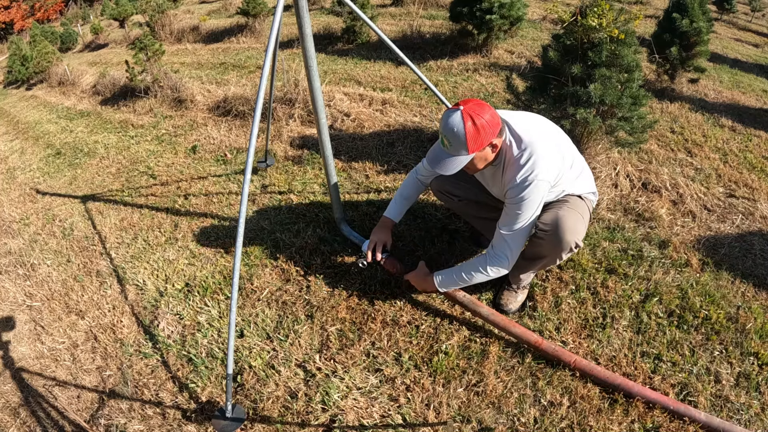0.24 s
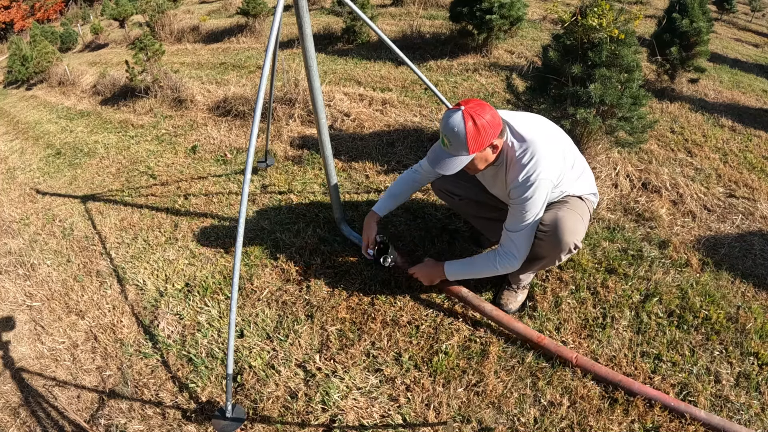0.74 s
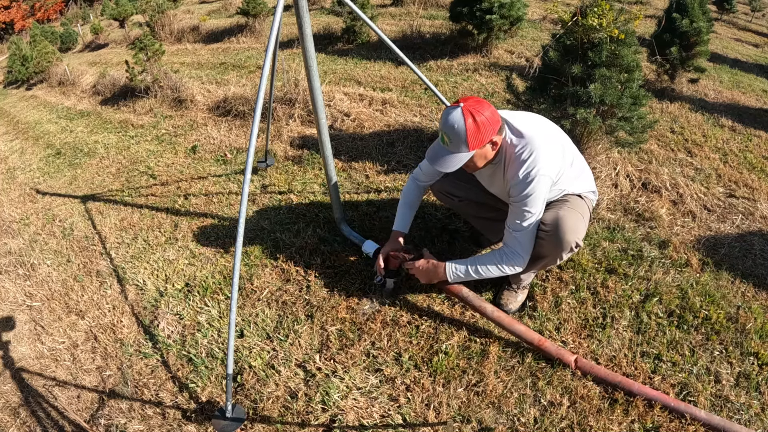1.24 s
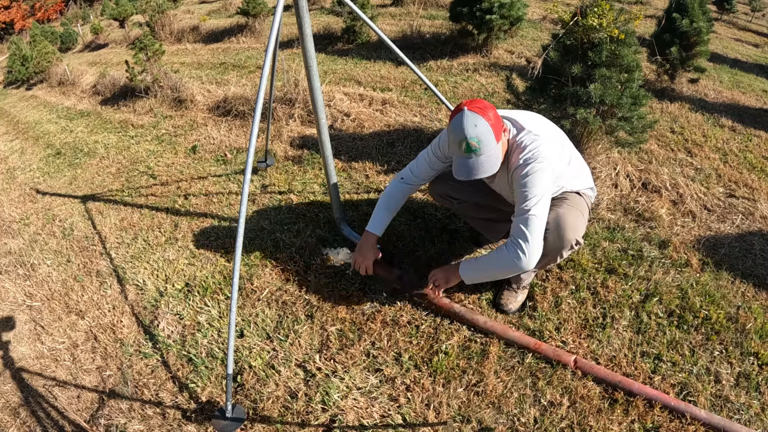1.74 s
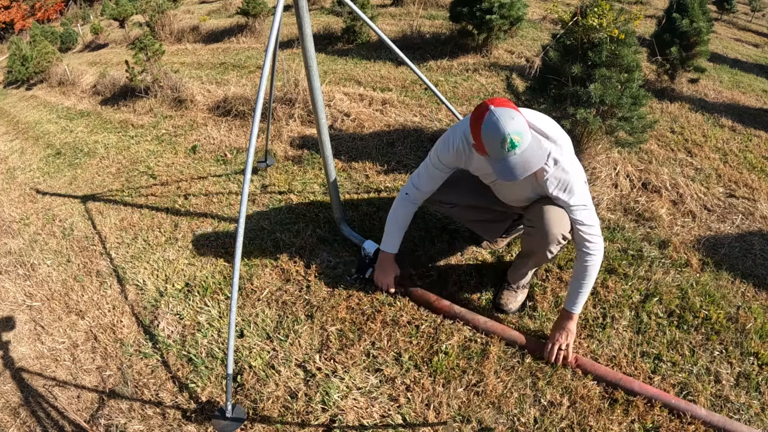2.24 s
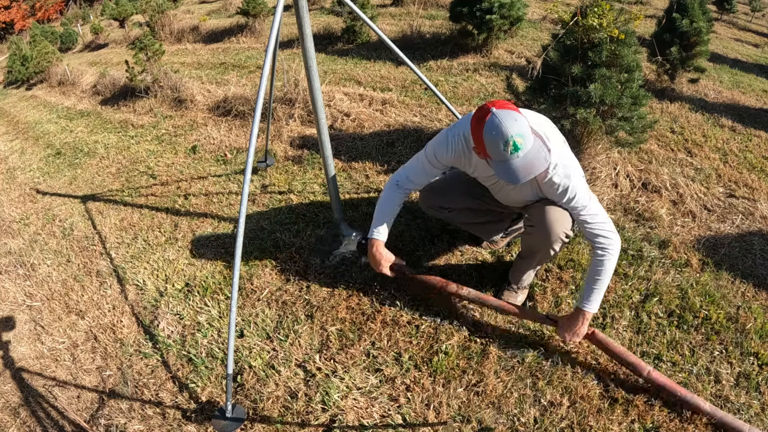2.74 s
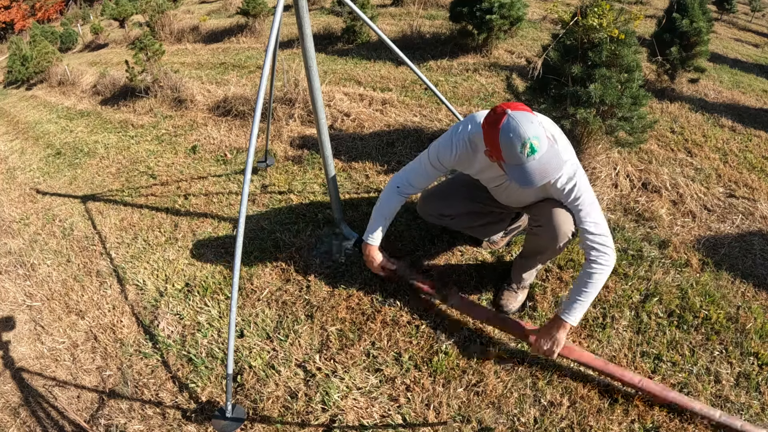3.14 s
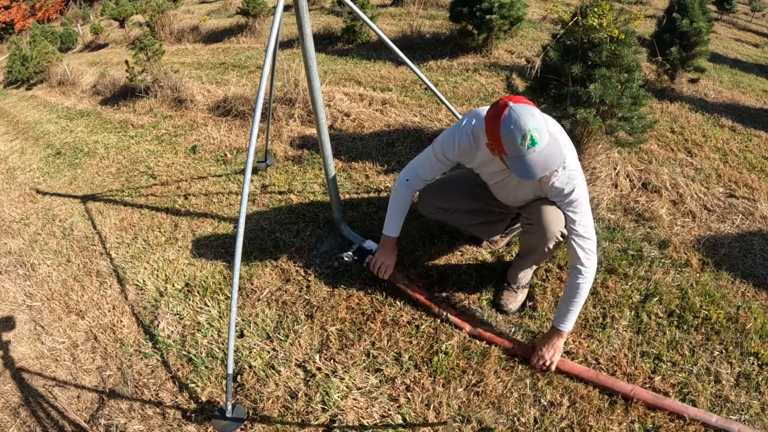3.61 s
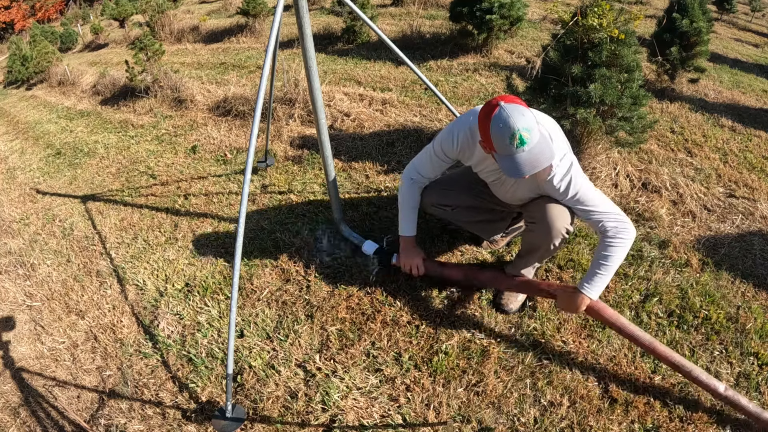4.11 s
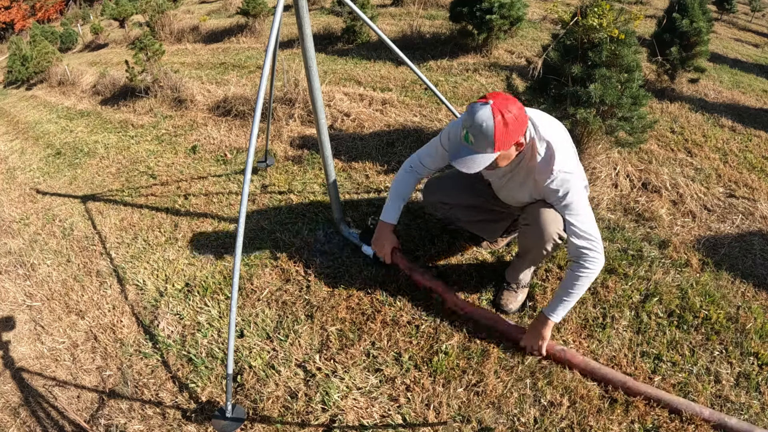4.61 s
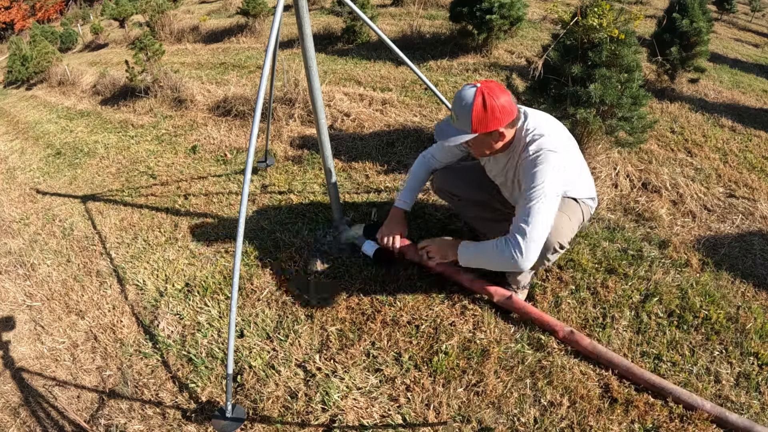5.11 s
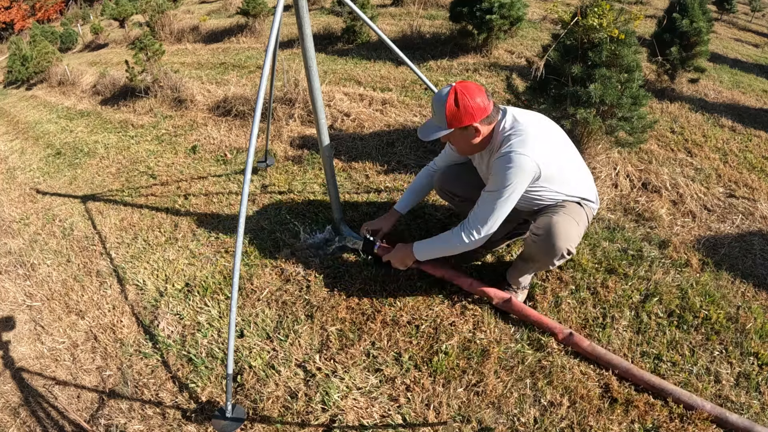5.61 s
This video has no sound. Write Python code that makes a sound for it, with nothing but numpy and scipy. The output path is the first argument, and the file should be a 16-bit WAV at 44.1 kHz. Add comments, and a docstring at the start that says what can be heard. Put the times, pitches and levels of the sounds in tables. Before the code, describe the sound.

Close, nearly mono outdoor sound of a leaking hose coupling twisted by hand. A thin hiss starts quietly, with gurgles and spits around one second, a brief squirt near 1.8, and stronger spray towards three. It drops at 3.5, then bursts back near four with loud bright plops. Sputtering continues unevenly and swells at the end, with small metal ticks, soft hose bumps on turf and low breeze buffeting the microphone.

```python
"""A thin hiss of water under slow breeze pushes, then spits, gurgles and plops from a leaking hose coupling.
The coupling on a sprinkler stand in an open field is twisted by hand: metal ticks, the hose bumps on the turf.
Spray is clumped resonant clicks over noise; spits are fluttering noise bursts with ringing cavities.
Gurgle and plops are decaying sines of rising pitch; ticks, bumps and breeze are shaped noise."""
import sys
import numpy as np
from scipy import signal
from scipy.fft import rfft, irfft, next_fast_len
from scipy.io import wavfile

SR = 44100
rng = np.random.default_rng(int(sys.argv[2]) if len(sys.argv) > 2 else 0)


def master(y):
    """Save y as 16-bit WAV."""
    cut = np.clip(np.atleast_2d(y).T, -1, 1)
    pcm = np.round(cut * 32767)  # scale
    wavfile.write(sys.argv[1], SR, pcm.astype(np.int16))


N = 258426
TIME = np.arange(N) / SR  # seconds

# Breeze on the microphone. Each row: time in seconds, level in dB.
BREEZE_LEVEL = [(.1, -22.5), (.27, -30.5), (.43, -14), (.6, -25), (1.5, -28), (2.3, -36), (3.6, -39.5),
                (4.3, -19), (4.6, -28), (4.85, -22), (5.15, -30.5), (5.5, -22), (5.8, -31.5)]
# Spectrum of the breeze's pressure swells. Each row: frequency in Hz, relative level in dB per Hz.
BREEZE_SPECTRUM = [(2, -0.5), (6, -4), (14, -28), (30, -32.5), (60, -50.5), (400, -76)]
# Distant outdoor hum and air. Each row: frequency in Hz, relative level in dB per Hz.
FIELD_SPECTRUM = [(50, 0), (68, -4), (85, -1), (115, -8), (220, -12), (1500, -17), (16000, -50)]
FIELD_DB = -56
# The hose landing or jerking on the turf.
# Each row: start in seconds, level in dB, decay in seconds, softness cut-off in Hz.
HOSE_BUMPS = [(3.251, -36.5, 0.036, 88), (3.250, -41.5, 0.012, 360), (3.35, -44.5, 0.074, 67),
              (3.98, -37, 0.022, 390), (5.577, -27.5, 0.003, 260)]
# The coupling's metal parts tick under the hands. Each row: start in seconds, level in dB before colouring.
METAL_TICKS = [(0.145, -48), (0.697, -35), (0.867, -44.5), (3.640, -35), (4.256, -41.5), (4.509, -36.5)]
# Colour of the ticks. Each row: frequency in Hz, filter gain in dB.
METAL_COLOUR = [(1500, -0.5), (8000, 10), (11800, 5), (16000, -7)]

# The steady leak opens and closes as the hose is twisted. Each row: time in seconds, spray level in dB.
LEAK_LEVEL = [(0, -52), (.58, -52), (.82, -50), (1.05, -45.5), (1.48, -45.5), (1.6, -47), (2.05, -48),
              (2.3, -46), (2.75, -41.5), (3.02, -39), (3.49, -52), (3.85, -41), (4.28, -48.5), (4.65, -51),
              (4.98, -41.5), (5.4, -43), (5.52, -44), (5.72, -37.5)]
# The seal slips and lets out a squirt. Each row: start in seconds, spray level in dB, hold in seconds.
SEAL_SQUIRTS = [(.43, -46.5, .06), (.95, -43, 0.1), (1.38, -45, 0.15), (1.835, -34, .055),
                (3.94, -39, 0.031), (4.06, -37.5, 0.034), (4.69, -42, 0.017), (5.325, -42.5, 0.012)]
SQUIRT_ATTACK_S, SQUIRT_RELEASE_S = 0.023, 0.049
# Trapped air bubbles out through the gap.
# Each row: start in seconds, gurgle level in dB, hold in seconds.
AIR_GULPS = [(.14, -54, 0.14), (.43, -47.5, 0.038), (.88, -44.5, .08), (.96, -34, 0.024), (1.05, -45, 0.28),
             (1.49, -45.5, 0.076), (1.86, -47, 0.042), (2.4, -49, 0.25), (3.92, -40, 0.04),
             (4.08, -42.5, 0.048), (4.95, -46.5, 0.24), (5.83, -39.5, .03)]
GULP_ATTACK_S, GULP_RELEASE_S = 0.019, 0.033
# Gurgle between gulps: level in dB at the mean leak, and its share of the leak's swing in dB
TRICKLE_DB, TRICKLE_FOLLOWS = -56, 0.61

# Large single bubbles.
# Each row: start in seconds, peak of the ring in dB, starting pitch in Hz, time to fall 60 dB in seconds.
LARGE_BUBBLES = [(0.215, -37, 1085, 0.014), (.698, -32.5, 920, 0.037), (0.7403, -25, 868, 0.017),
                 (0.9, -23.5, 1290, 0.017), (0.901, -26.5, 324, 0.011), (0.971, -29.5, 358, 0.039),
                 (1.035, -28, 1020, 0.018), (1.311, -35.5, 554, .025), (1.504, -31, 1110, 0.022),
                 (1.622, -33.5, 1094, 0.034), (1.988, -31, 1440, 0.015), (2.338, -32, 2160, 0.027),
                 (2.358, -26.5, 1680, 0.006), (2.446, -27.5, 2020, 0.03), (3.9055, -23, 1030, 0.0078),
                 (3.933, -14, 1346, 0.024), (3.9345, -15, 1720, 0.013), (4.421, -15.5, 1640, 0.02),
                 (4.511, -27.5, 1840, 0.034), (4.62, -38.5, 1164, .04), (4.846, -24, 933, 0.017),
                 (4.861, -26.5, 1240, 0.014), (4.904, -32, 1010, .02), (4.975, -31.5, 860, 0.056),
                 (5.077, -18.5, 860, 0.0096), (5.127, -16, 1130, 0.0022), (5.28, -32, 1510, .018),
                 (5.653, -24.5, 1070, 0.0049), (5.7027, -24, 1250, 0.0051)]
# Typical bubble pitch in the escaping water. Each row: time in seconds, pitch in Hz.
BUBBLE_CENTRE = [(.2, 1052), (.8, 1194), (1.15, 1100), (1.33, 815), (1.5, 1116), (2.0, 1220), (2.42, 1810),
                 (2.62, 1132), (3.5, 1330), (5.0, 1188)]
# Spits of air and water from the gap.
# Each row: start in seconds, level in dB before colouring, length in seconds, centre in Hz.
GAP_SPITS = [(0.145, -39, 0.00061, 2110), (0.362, -43, .0005, 1900), (0.535, -37.5, .0005, 2320),
             (0.653, -38, 0.0033, 2500), (0.696, -36, 0.002, 2980), (0.717, -40.5, 0.0065, 2960),
             (.93, -22.5, 0.00082, 2200), (0.957, -20.5, 0.0046, 5800), (.991, -24, 0.0012, 2190),
             (1.005, -21, 0.00088, 2670), (2.787, -27.5, 0.0068, 3430), (2.807, -31.5, 0.017, 2090),
             (2.902, -28.5, 0.00097, 3420), (2.926, -33, 0.017, 2700), (3.152, -25, 0.0017, 2500),
             (3.16, -29, 0.0097, 3240), (3.351, -34, .001, 2530), (3.383, -38.5, 0.022, 3840),
             (3.405, -29, 0.0044, 2940), (3.537, -39, 0.016, 3450), (3.644, -34, 0.002, 4900),
             (3.679, -29.5, 0.0037, 2550), (3.723, -35.5, 0.0062, 1950), (3.922, -29, 0.0024, 2670),
             (3.962, -23, 0.0057, 1460), (3.98, -22.5, 0.00076, 1250), (4.394, -25, 0.00069, 2670),
             (4.509, -36, 0.0014, 2330), (4.84, -26, .001, 3340), (4.845, -34.5, 0.0075, 3040),
             (5.08, -34.5, 0.002, 1430), (5.13, -33, 0.0015, 1400), (5.56, -31.5, 0.019, 3020),
             (5.575, -21.5, 0.004, 1760), (5.682, -31, 0.0061, 2180), (5.706, -26, 0.0011, 3480),
             (5.761, -33.5, 0.0053, 2550)]
# Colour shared by all spits. Each row: frequency in Hz, filter gain in dB.
SPIT_TONE = [(400, -0.5), (1000, 4), (6500, 1.5), (10000, -3), (16000, -10)]
# Small spits in between: rate, middle level in dB above the spray, length in seconds, middle pitch in Hz
SPUTTERS_PER_S, SPUTTER_DB, SPUTTER_S, SPUTTER_HZ = 17, 3.5, 0.00026, 2500
# Colour of the spray on the grass. Each row: frequency in Hz, filter gain in dB.
SPRAY_COLOUR = [(150, -17), (450, -1), (900, -12.5), (1700, 3), (3000, 2), (4500, 2.5), (6200, 1),
                (8000, -7), (10000, -12), (16000, -28)]
# The jet at times slackens to a dribble of coarser, duller drops. Each row: time in seconds, treble in dB.
DROP_FINENESS = [(.3, -0.5), (1.2, 3.5), (2.05, -0.5), (2.5, -4.5), (2.8, 3), (5.7, 3)]

# The reflection off the ground cancels narrow bands. Each row: centre in Hz, width in Hz, depth in dB.
GROUND_NOTCHES = [(2450, 420, -3), (5264, 590, -12), (7070, 480, -12.5), (8910, 160, -18.5)]
# Level of a faint side signal by frequency. Each row: frequency in Hz, filter gain in dB.
SIDE_LEVEL = [(300, -16), (1500, -48.5), (5000, -43.5), (14000, -14)]
CUTOFF_HZ = 15900


def from_db(db):
    """Decibels to gain."""
    return 10 ** (np.asarray(db) / 20)


def rms_one(x):
    """Scale to rms 1."""
    return x / np.sqrt(np.mean(x ** 2) + 1e-20)


def in_time(rows):
    """Join the points of a two-column curve with straight lines, one value per sample."""
    seconds, values = np.transpose(rows)
    return np.interp(TIME, seconds, values)


def causal_filter(x, db_at):
    """Minimum-phase filter with the gain db_at(Hz): nothing sounds early."""
    size = 2 * next_fast_len(len(x) // 2 + 8192)
    gain = from_db(db_at(np.fft.rfftfreq(size, 1 / SR)))
    # folding the cepstrum forward gives the minimum phase
    cepstrum = irfft(np.log(gain))
    cepstrum[1:size // 2] *= 2
    cepstrum[size // 2 + 1:] = 0
    response = np.exp(rfft(cepstrum))
    return irfft(rfft(x, size) * response)[:len(x)]


def coloured(x, spectrum):
    """Filter by a table of Hz and dB, with straight lines over log frequency."""
    hz, db = np.transpose(spectrum)
    return causal_filter(x, lambda f: np.interp(np.log(f + 1e-9), np.log(hz), db))


def resonate(x, hz, q):
    """Ring a single resonance with x."""
    return signal.lfilter(*signal.iirpeak(hz, q, fs=SR), x)


def drift(rate):
    """Slow chance with rms 1 and a new random target rate times a second."""
    return rms_one(np.interp(TIME * rate, np.arange(4096), rng.standard_normal(4096)))


def impacts(per_s, spread_db):
    """Clicks of either sign at random moments: many small, few large."""
    sizes = from_db(spread_db * np.minimum(rng.exponential(1, N), 4))
    return sizes * rng.choice([-1, 1], N) * (rng.random(N) < per_s / SR)


def add(out, s, sound):
    """Mix a sound in at time s."""
    start = int(np.clip(s * SR, 0, N))
    out[start:start + len(sound)] += sound[:N - start]


def outdoors():
    """Slow pressure swells of the breeze over the quiet field, both shaped from noise."""
    swell = rms_one(coloured(rng.standard_normal(N), BREEZE_SPECTRUM))
    field = rms_one(coloured(rng.standard_normal(N), FIELD_SPECTRUM))
    return from_db(in_time(BREEZE_LEVEL)) * swell + from_db(FIELD_DB) * field


def hose_bumps():
    """The heavy hose meets the turf unevenly along its length: a soft thud with a short rumble."""
    out, t = np.zeros(N), TIME[:SR // 2]
    for s, db, decay_s, hz in HOSE_BUMPS:
        thud = rng.standard_normal(len(t)) * np.exp(-t / decay_s)
        band = signal.butter(2, [hz / 4, hz], "band", fs=SR, output="sos")
        rumble = signal.sosfilt(band, thud)
        # set the energy, so that a longer bump carries more
        rumble *= np.sqrt(decay_s * SR / 2 / np.sum(rumble ** 2))
        add(out, s, from_db(db) * rumble)
    return out


def ticks(fade_s=0.0038, grit_db=-14, scatter_s=0.082, count=5):
    """Gritty metal slips a hair's breadth: a thin, quickly damped click among fainter scattered slips."""
    out, t = np.zeros(N), TIME[:2048]
    fade = np.exp(-t / fade_s)
    for s, db in METAL_TICKS:
        add(out, s, from_db(db) * rng.standard_normal(len(t)) * fade)
        for offset, force in zip(rng.standard_normal(count), rng.random(count)):
            slip = force * from_db(db + grit_db) * rng.standard_normal(len(t)) * fade
            add(out, s + scatter_s * offset, slip)
    return coloured(out, METAL_COLOUR)


def swells(rows, attack_s, release_s):
    """Summed power of events that each build up, hold and die away."""
    power = np.zeros(N)
    for s, db, hold_s in rows:
        before = np.maximum(s - TIME, 0)
        after = np.maximum(TIME - s - hold_s, 0)
        power += from_db(db) ** 2 * np.exp(-2 * before / attack_s - 2 * after / release_s)
    return power


def outflow():
    """Spray and gurgle levels in dB: squirts add power to the leak, gulps to the trickle that it feeds."""
    leak_db = in_time(LEAK_LEVEL)
    trickle_db = TRICKLE_DB + TRICKLE_FOLLOWS * (leak_db - leak_db.mean())
    spray_power = from_db(leak_db) ** 2 + swells(SEAL_SQUIRTS, SQUIRT_ATTACK_S, SQUIRT_RELEASE_S)
    gurgle_power = from_db(trickle_db) ** 2 + swells(AIR_GULPS, GULP_ATTACK_S, GULP_RELEASE_S)
    return 10 * np.log10(spray_power), 10 * np.log10(gurgle_power)


def bubble(hz, t60, rise, swell_cycles):
    """A bubble pinches off, swells quickly and rings out with rising pitch; its envelope peaks at 1."""
    t = TIME[:int(t60 * SR) + 2]
    swell = 1 - np.exp(-(t * hz / swell_cycles) ** 2)
    height = swell * from_db(-60 * t / t60)
    # pitch climbs by the fraction `rise` over t60
    phase = 2 * np.pi * hz * t * (1 + rise * t / t60 / 2)
    return height / height.max() * np.sin(phase)


def plops(splash_db=-14):
    """Large bubbles break with a tiny noisy splash and ring briefly at a clear pitch."""
    out = np.zeros(N)
    for s, db, hz, t60 in LARGE_BUBBLES:
        ring = bubble(hz, t60, rise=0.054, swell_cycles=2.07)
        splash = rms_one(resonate(rng.standard_normal(len(ring)) * ring ** 2, hz, q=1))
        add(out, s, from_db(db) * (ring + from_db(splash_db) * ring.std() * splash))
    return out


def bubbling(level_db, centre_hz, octaves, cycles, size_db, count):
    """A swarm of bubbles about a centre pitch: single ones in a trickle, a dense mass in a gush."""
    out = np.zeros(N)
    density = from_db(.7 * (level_db - level_db.max()))
    chances, shapes = rng.random((count, 3)), rng.standard_normal((count, 2))
    for (when, sign, luck), (pitch, size) in zip(chances, shapes):
        at = int(when * N)
        if luck < density[at]:
            hz = centre_hz[at] * 2 ** (octaves * np.clip(pitch, -2, 2))
            # sparse bubbles are taller, which evens out the swarm's power
            height = np.sign(sign - .5) * from_db(size_db * min(size, 2)) / np.sqrt(density[at])
            add(out, at / SR, height * bubble(hz, cycles / hz, rise=0.36, swell_cycles=0.32))
    return from_db(level_db) * rms_one(out)


def gurgle(spray_db, gurgle_db, deep_db=-1, fizz_db=-5.0, wander_octaves=0.14):
    """Water churns with trapped air; a strong gush favours deep bubbles, the landing spray adds tiny ones."""
    centre_hz = in_time(BUBBLE_CENTRE) * 2 ** (wander_octaves * drift(20))
    churn = bubbling(gurgle_db, centre_hz, octaves=0.26, cycles=20.8, size_db=2.5, count=7000)
    # widened swings let the deep bubbles fall away sooner
    gush_db = gurgle_db + 0.57 * (gurgle_db - gurgle_db.max())
    deep = bubbling(gush_db + deep_db, 0.483 * centre_hz, octaves=0.38, cycles=14.0, size_db=6.5, count=4000)
    fizz = bubbling(spray_db + fizz_db, 1.722 * centre_hz, octaves=0.465, cycles=46.6, size_db=7.0, count=3200)
    return churn + deep + fizz


def spit(db, length, hz, q=0.78, fade_s=0.0024, tail_s=0.024, tail_db=-16, ring_q=5, flutter_db=3):
    """Air tears through the gap in a fluttering rasp and rings wet cavities; droplets trail behind."""
    t = TIME[:4096]
    after = np.maximum(t - length, 0)
    attack = np.minimum(t / (.0004 + length / 8), 1)
    # a new random flutter level 900 times a second
    flutter = from_db(flutter_db * np.interp(t * 900, np.arange(128), rng.standard_normal(128)))
    fade = np.exp(-after / fade_s) + from_db(tail_db) * np.exp(-after / tail_s)
    air = rng.standard_normal(len(t)) * attack * flutter * fade
    rasp = resonate(air, hz, q)
    for cavity_hz in hz * 2 ** rng.uniform(-1.056, 0.86, size=2):
        rasp += resonate(air, cavity_hz, ring_q)
    # set the energy, so that a longer spit carries more
    return from_db(db) * rasp * np.sqrt((length + fade_s) * SR / np.sum(rasp ** 2))


def spits(spray_db, spread_db=4, octaves=0.93):
    """The big spits, and among them a random sputter that grows with the spray."""
    out = np.zeros(N)
    for s, db, length, hz in GAP_SPITS:
        add(out, s, spit(db, length, hz))
    for when, size, pitch in rng.uniform(-1, 1, (int(SPUTTERS_PER_S * N / SR), 3)):
        at = int(abs(when) * (N - 1))
        db = spray_db[at] + SPUTTER_DB + spread_db * size
        add(out, at / SR, spit(db, SPUTTER_S, SPUTTER_HZ * 2 ** (octaves * pitch)))
    return coloured(out, SPIT_TONE)


def spray(spray_db, drops_per_s=2200, clump_db=3, mist_db=-7, drop_q=5, surge_db=0.9):
    """Drops of each size clump over a fine mist; the jet surges, and more fall as the leak opens."""
    flow = from_db(spray_db - spray_db.mean())
    # more drops when the leak opens, at an even power until the level is set below
    hits = impacts(drops_per_s * flow, spread_db=1) / np.sqrt(flow)
    pitches = np.geomspace(1200, 15000, 24)  # Hz, one per drop size
    dealt = rng.integers(0, len(pitches), N)
    drops = np.zeros(N)
    for k, hz in enumerate(pitches):
        clumps = from_db(clump_db * drift(70))
        drops += resonate(hits * (dealt == k) * clumps + 1e-18, hz, drop_q)
    mist = from_db(mist_db) * rng.standard_normal(N)
    surge = from_db(surge_db * drift(40))
    patter = rms_one(coloured((rms_one(drops) + mist) * surge, SPRAY_COLOUR))
    # finer drops sound brighter
    treble = signal.sosfilt(signal.butter(1, 5500, "high", fs=SR, output="sos"), patter)
    brighter = (from_db(in_time(DROP_FINENESS)) - 1) * treble
    return from_db(spray_db) * (patter + brighter)


def over_ground(x):
    """Direct and reflected sound cancel in a row of dips, drawn here as a filter curve."""
    def dips_db(f):
        return sum(db / (1 + (2 * (f - hz) / width) ** 2) for hz, width, db in GROUND_NOTCHES)
    return causal_filter(x, dips_db)


def scene():
    """Every source sits in the centre; a faint side signal is drawn afresh from spray, spits and ticks."""
    spray_db, gurgle_db = outflow()
    water = over_ground(spray(spray_db) + spits(spray_db) + gurgle(spray_db, gurgle_db) + plops())
    mid = water + ticks() + hose_bumps() + outdoors()
    # added left and subtracted right
    side = coloured(over_ground(spray(spray_db) + spits(spray_db)) + ticks(), SIDE_LEVEL)
    return np.array([mid + side, mid - side])


def record(dry):
    """The top is cut steeply."""
    return signal.sosfilt(signal.ellip(10, .2, 70, CUTOFF_HZ, fs=SR, output="sos"), dry)


dry = scene()
out = record(dry)
master(out)
```